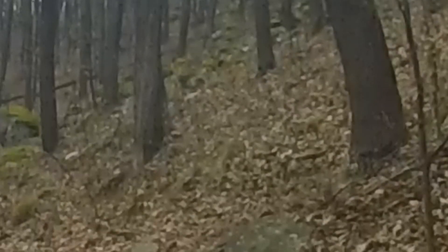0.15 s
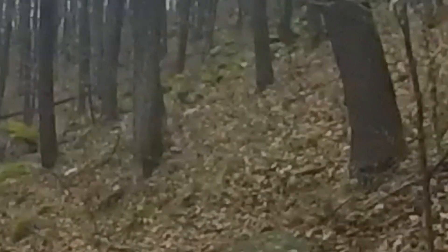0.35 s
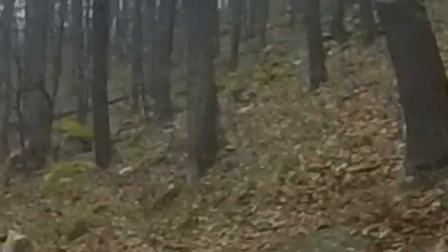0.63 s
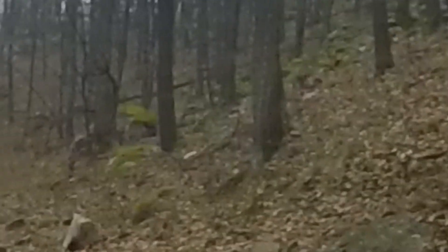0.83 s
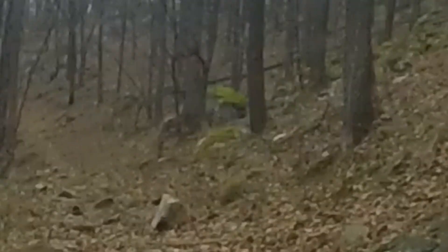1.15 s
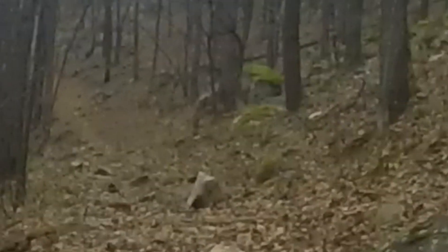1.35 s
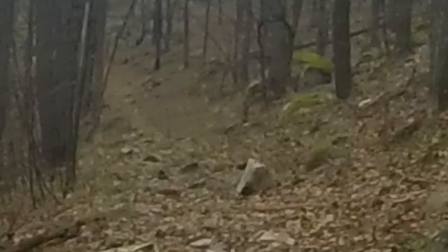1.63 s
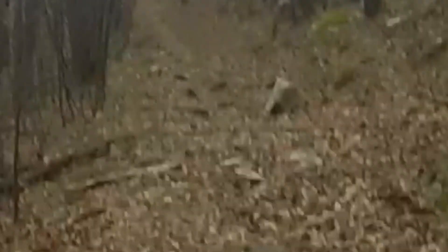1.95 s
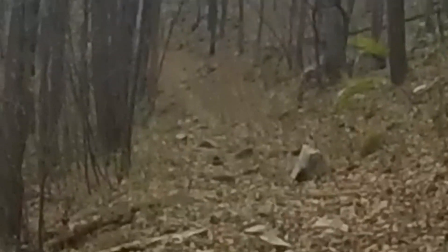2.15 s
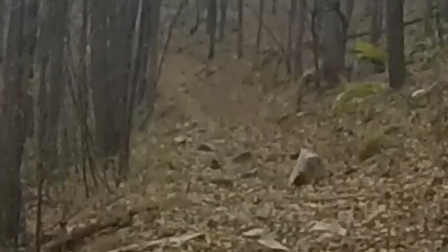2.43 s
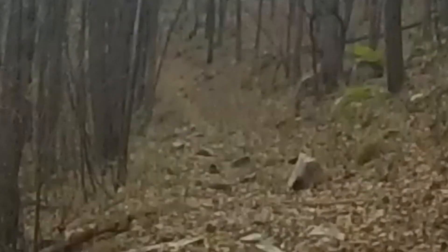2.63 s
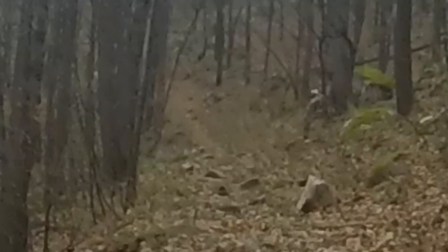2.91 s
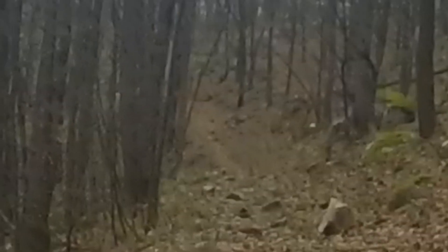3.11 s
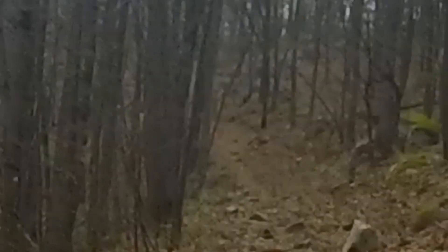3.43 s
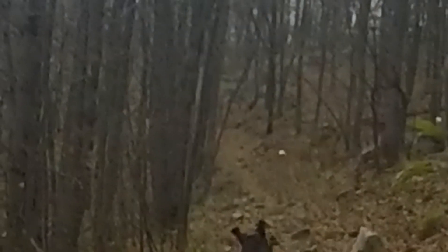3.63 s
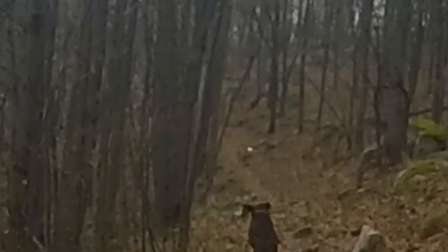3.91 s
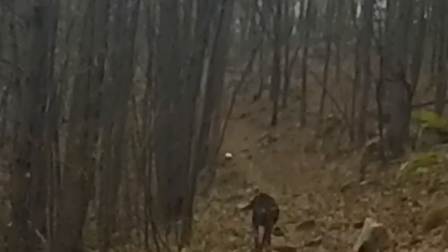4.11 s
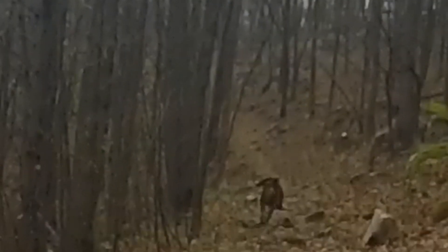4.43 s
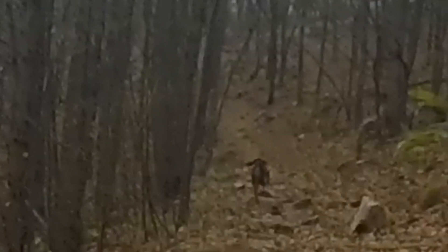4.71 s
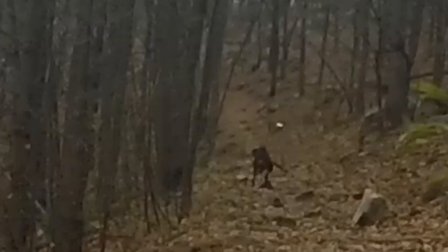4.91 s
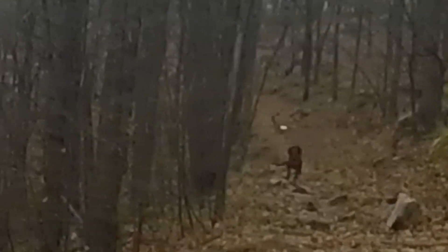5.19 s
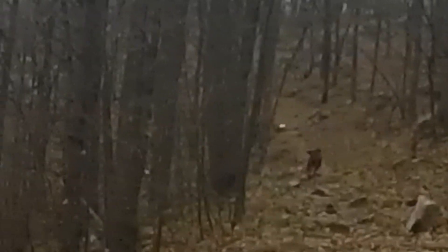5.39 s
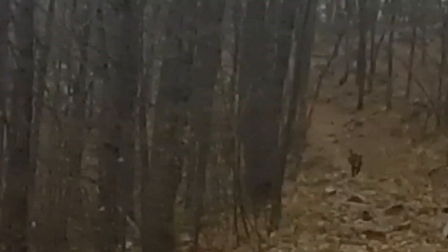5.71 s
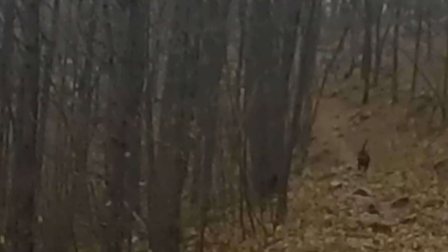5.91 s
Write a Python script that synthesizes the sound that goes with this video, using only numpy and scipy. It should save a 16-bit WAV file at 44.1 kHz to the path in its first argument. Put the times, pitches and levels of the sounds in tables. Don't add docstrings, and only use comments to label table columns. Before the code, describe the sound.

A small cased microphone is carried along a leafy woodland path. Twigs tick and snap close up with brief leaf scrapes and low handling rumble, building to one very loud, sharp crack at about two seconds. Small rustles follow, then a run of hard plastic clasp clicks. It grows quiet, with only faint ticks, steady soft hiss, a thin high insect chirp and a faint distant dog yip at the end.

```python
import sys
import numpy as np
from scipy import signal
from scipy.fft import rfft, irfft, next_fast_len
from scipy.io import wavfile
from scipy.ndimage import uniform_filter1d

SR = 44100
rng = np.random.default_rng(int(sys.argv[2]) if len(sys.argv) > 2 else 0)


def gain_from_db(level_db):
    decades = np.asarray(level_db, float) / 20
    return 10 ** decades


def pcm_store(signal):
    levels = np.round(np.clip(np.atleast_2d(signal), -1, 1) * 32767)
    wavfile.write(sys.argv[1], SR, levels.astype(np.int16).T)


N = 267025

# (f/Hz, level/dB, t60/s)
CASE_MODES = [(487, -11, 0.011), (761, -2.5, 0.02), (1198, -0.5, 0.016), (1656, -7, 0.014),
              (1970, -1.5, 0.0092), (2350, 2.5, 0.012), (2895, -3, 0.0087), (3530, -6, 0.0079),
              (3940, -7.5, 0.0083), (4360, -5.5, 0.0094), (5140, 0, 0.002), (6500, -4, 0.003),
              (7450, -8.5, 0.0063), (8890, -6, 0.0026), (10160, -9, 0.0019), (12800, -7, 0.0013)]


def level(x, db):
    return x * gain_from_db(db) / np.sqrt(np.mean(x ** 2))


def ring(x, modes):
    out = 0
    for k, (hz, db, t60_s) in enumerate(modes):
        pole = np.exp(2j * np.pi * hz / SR - np.log(1000) / (t60_s * SR))
        out = out + (-1) ** k * gain_from_db(db) * signal.lfilter([1], [1, -pole], x).imag
    return out


def tint(x, gain):
    size = next_fast_len(len(x))
    hz = np.maximum(np.fft.rfftfreq(size, 1 / SR), 10)
    return irfft(rfft(x, size) * gain(hz), size)[:len(x)]


def add(track, s, sound):
    i = int(s * SR)
    track[i:i + len(sound)] += sound[:N - i]


def walk(rate_hz):
    hold = int(SR / rate_hz)
    steps = np.repeat(rng.standard_normal(N // hold + 1), hold)
    return 1.3 * uniform_filter1d(uniform_filter1d(steps, hold), hold)[:N]


def strikes(rows, modes, weight_db, rough):
    out = np.zeros(N)
    t_ms = np.arange(2600) / SR * 1000
    splinters = rng.standard_normal((len(rows), len(t_ms)))
    for (s, peak_db, colour, push_ms), splinter in zip(rows, splinters):
        push = rough * splinter * np.exp(-2 * t_ms / push_ms)
        push[:3] += [.3, .6, .3]
        push[26:29] += [.35, .7, .35]
        weighted = [(hz, db + weight_db(hz, colour), t60_s) for hz, db, t60_s in modes]
        sound = ring(push, weighted)
        add(out, s, gain_from_db(peak_db) * sound / np.abs(sound).max())
    return out


def wood():
    # (f/Hz, density/dB per Hz)
    spectrum = [(15, -58), (25, -2), (48, 0), (373, -8.5), (416, -9.5), (516, -11.5), (1790, -16),
                (5000, -23.5), (12900, -35.5), (14800, -40), (16000, -74)]
    hz, db = np.transpose(spectrum)

    def colour(f):
        slope_db = np.interp(np.log(np.minimum(f, 14600)), np.log(hz), db)
        return gain_from_db(slope_db) / (1 + (f / 15150) ** 160)

    hiss = tint(rng.standard_normal(N), colour)
    drift_db = .25 * walk(1.5) + .5 * walk(12)
    return level(hiss * gain_from_db(drift_db), -60)


def sway():
    # (t/s, level/dB)
    rumble = [(0, -74), (.3, -61), (.58, -54), (.95, -59), (1.25, -51), (1.5, -55), (1.8, -50.5),
              (1.94, -40.5), (2.1, -50), (2.22, -62), (2.75, -66.5), (3.47, -65.5), (3.9, -77), (4.84, -63),
              (5.15, -71.5), (6.05, -74)]
    s, db = np.transpose(rumble)
    low = tint(rng.standard_normal(N), lambda hz: 1 / (1 + (hz / 46.0) ** 2.25) / (1 + (16.7 / hz) ** 3))
    lumpy = level(low * gain_from_db(5.0 * walk(25)), 0)
    return lumpy * gain_from_db(np.interp(np.arange(N) / SR, s, db))


def insect():
    # (start/s, length/s, f/Hz, level/dB)
    tones = [
        (5.65, .1, 8800, -83),
        (5.65, .11, 13200, -87),
        (5.67, .07, 10300, -89),
        (0, 6.05, 11400, -96),
    ]
    out = np.zeros(N)
    for s, length_s, hz, db in tones:
        count = int(length_s * SR)
        phase = 2 * np.pi * np.cumsum(hz * (1 + .004 * walk(150)[:count])) / SR
        fade = signal.windows.tukey(count, .4)
        add(out, s, gain_from_db(db) * fade * np.sqrt(2) * np.sin(phase))
    return out


def twigs():
    # (t/s, peak/dB, centre f/Hz)
    snaps = [(0.141, -51, 1500), (0.3736, -35, 1480), (.3848, -33, 3940), (0.508, -45, 1380),
             (.5651, -49, 3040), (0.6359, -37, 1200), (0.9937, -48, 2300), (1.0523, -37.5, 720),
             (1.3945, -33.5, 2920), (1.6912, -28.5, 2700), (1.8183, -31.5, 2350), (1.899, -50, 1660),
             (1.924, -38, 1880), (1.9591, -37, 2400), (2.1562, -45, 1380), (2.1852, -48, 2350),
             (2.251, -46, 4740), (2.353, -42, 1230), (2.7145, -48, 2380), (2.8715, -48, 6500),
             (3.3125, -44.5, 2970), (3.3397, -47, 2200), (3.3997, -45, 1390), (3.4228, -45, 7000),
             (3.4678, -39.5, 1160), (4.3215, -56, 5000), (4.3558, -49, 5100), (5.0405, -55, 9700),
             (5.059, -61, 800)]
    # (t/s, peak/dB, centre f/Hz, dull splinter level/dB, bright splinter level/dB)
    breaks = [
        (0.3835, -25.5, 2360, 0, -10.5),
        (.4912, -39.5, 1480, -25, -5.5),
        (1.9406, -8.5, 1850, -11, -30),
        (1.9418, -13, 3940, -7.5, -9.5),
        (4.3557, -41, 2700, -28, -5),
        (4.8600, -50, 2150, 8.5, -1),
    ]
    snap_push_ms, break_push_ms = 2.8, .75
    splinter_ratio, dull_late_ms, bright_late_ms = 3.73, .86, .6

    def push_ms(ms, hz):
        return ms * (2000 / hz) ** .67

    def weight_db(hz, centre_hz):
        octaves = np.log2(hz / centre_hz)
        return -17 * octaves ** 2 / (1 + .4 * (hz > centre_hz))

    rows = [(s, db, hz, push_ms(snap_push_ms, hz)) for s, db, hz in snaps]
    for s, db, hz, dull_db, bright_db in breaks:
        parts = [(0, 0, hz),
                 (dull_late_ms, dull_db, hz / splinter_ratio),
                 (bright_late_ms, bright_db, hz * splinter_ratio)]
        for late_ms, part_db, part_hz in parts:
            rows.append((s + late_ms / 1000, db + part_db, part_hz, push_ms(break_push_ms, part_hz)))
    return strikes(rows, CASE_MODES, weight_db, rough=.22)


def litter_tail(dry_clicks):
    t = np.arange(6000) / SR
    scatter = rng.standard_normal(len(t)) * np.exp(-t * np.log(1000) / 0.021)
    return gain_from_db(-33.0) * signal.fftconvolve(dry_clicks, scatter)[:N]


def leaves():
    # (start/s, length/s, level/dB, brightness/dB per octave)
    scrapes = [(0.352, 0.044, -53, -0.6), (0.384, 0.026, -52.5, -1.7), (0.629, 0.051, -50, 0.2),
               (0.777, 0.2, -55.5, -1), (0.861, 0.11, -60, 3.5), (1.816, 0.39, -48, -0.3),
               (1.942, 0.033, -55.5, -2.5), (1.995, 0.3, -53.5, 0), (2.34, 0.079, -52, 4),
               (2.503, 0.062, -56.5, 3), (2.575, 0.2, -56, 5), (2.739, 0.17, -63, 4),
               (2.868, 0.026, -66, 6), (3.083, 0.068, -60, 2), (3.188, 0.046, -63, 3),
               (3.308, 0.032, -65, 3.5), (3.425, 0.015, -68.5, -1), (3.606, 0.096, -61, 1),
               (4.314, 0.049, -66.5, 6), (4.862, 0.022, -64.5, -7.5)]
    size, clump = 8000, 160
    out = np.zeros(N)
    for (s, length_s, db, tilt_db), chance in zip(scrapes, rng.random((len(scrapes), 4, size))):
        grain_size = gain_from_db(-2.0 * np.log(chance[2] + 1e-9))
        grains = (chance[0] - .5) * (chance[1] < .35) * grain_size
        clumps = gain_from_db(11 * uniform_filter1d(np.repeat(chance[3, ::clump], clump), size=100))
        along = np.minimum(np.arange(size) / (length_s * SR), 1)
        swell = np.sin(np.pi * along ** .65) ** 2
        modes = [(hz, g + tilt_db * np.log2(hz / 2000), (t60_s + .004) * min(1, (6500 / hz) ** 2))
                 for hz, g, t60_s in CASE_MODES]
        sound = ring(grains * clumps * swell, modes)
        add(out, s, level(sound, db - 12.0) / np.sqrt(length_s * SR / size))
    return tint(out, lambda hz: 1 / (1 + (hz / 14800) ** 30))


def jolts():
    # (t/s, peak/dB, length/ms, inward 1 or outward -1)
    pushes = [(0.3782, -33.5, 7.4, -1), (0.4896, -46, 7.9, -1), (0.574, -38, 8.3, -1),
              (0.5945, -29, 3.55, -1), (0.597, -36, 4.2, 1), (0.602, -34, 9.2, -1), (0.633, -30, 12, -1),
              (1.9396, -12, 7.14, 1), (3.4689, -44, 1.9, -1), (4.859, -45, 5.8, -1), (5.479, -47.5, 6.7, 1)]
    soft_share, vent_hz = .83, 24.
    out = np.zeros(N)
    for s, peak_db, length_ms, sign in pushes:
        push = signal.windows.tukey(int(length_ms * SR) // 1000, soft_share)
        add(out, s, np.sign(sign) * gain_from_db(peak_db) * push)
    return 1.35 * signal.lfilter(*signal.butter(2, vent_hz, "high", fs=SR), out)


def clasp():
    # (t/s, peak/dB, brightness/dB)
    shuts = [
        (3.042, -21.5, 2),
        (3.0855, -39.5, 0),
        (3.1853, -22.5, 0.5),
        (3.3557, -22.5, 2),
        (3.423, -39, -8.5),
        (3.6397, -22.5, 1),
    ]
    # (t/s, peak/dB, brightness/dB)
    opens = [
        (3.2538, -31.5, .4),
        (3.515, -28.5, 0.34),
        (3.7061, -33, -0.31),
    ]
    # (f/Hz, level/dB, t60/s)
    shut_modes = [(1083, -9, 0.037), (1240, -16, 0.05), (1747, -2, 0.019), (2380, 0.5, 0.014),
                  (2680, 3, 0.012), (3520, -0.5, 0.0087), (3970, -3, 0.011), (4405, 1, 0.012),
                  (5690, -9, 0.0072), (6500, -17.5, 0.0047), (8900, -25.5, 0.0053)]
    # (f/Hz, level/dB, t60/s)
    open_modes = [(1130, -4.5, 0.029), (1720, -4.5, 0.025), (2420, 8.5, 0.021), (2940, 6, 0.0051),
                  (3400, 0, 0.01), (4040, 1.5, 0.018), (4630, -4, 0.011), (5500, -14, .007),
                  (8070, -12.5, 0.006)]
    shut_push_ms, open_push_ms = 1.9, .84

    def lift_db(hz, bright_db):
        return (hz > 2600) * bright_db

    shut_rows = [(*row, shut_push_ms) for row in shuts]
    open_rows = [(*row, open_push_ms) for row in opens]
    shutting = strikes(shut_rows, shut_modes, lift_db, rough=.14)
    return shutting + strikes(open_rows, open_modes, lift_db, rough=.14)


def dog():
    start_s, attack_s, hold_s, release_s = 5.932, .014, .086, .024
    from_hz, top_hz, glide_s = 950, 1198, .08
    yip_db, swell_db, quiet_db = -53.5, 2.5, -26
    second_db, second_joins_s = -5, .037
    t = np.arange(N) / SR - start_s
    hz = from_hz + (top_hz - from_hz) * np.sin(np.pi / 2 * np.clip(t / glide_s, 0, 1))
    corners_s = np.cumsum([0, attack_s, hold_s, release_s])
    shape_db = np.interp(t, corners_s, [quiet_db, 0, swell_db, quiet_db], left=-80)
    fading_octave_db = -56 - 300 * np.maximum(t, 0)
    second_share = gain_from_db(second_db) * np.clip(t / second_joins_s, 0, 1)
    out = 0
    for ratio, share, octave_db in (.99, 1, fading_octave_db), (.93, second_share, -66.5):
        phase = 2 * np.pi * np.cumsum(ratio * hz * (1 + .012 * walk(120))) / SR
        voice = gain_from_db(yip_db) * np.sin(phase) + gain_from_db(octave_db) * np.sin(2 * phase)
        out = out + share * gain_from_db(shape_db) * voice
    return np.sqrt(2) * out


def scene():
    clicks = twigs() + clasp()
    hit = clicks + litter_tail(clicks) + leaves() + jolts()
    return (hit + wood() + sway() + insect() + dog())[None]


def band_limit(x):
    return signal.sosfilt(signal.butter(12, 16500, fs=SR, output="sos"), x)


def record(dry):
    low_pass = signal.ellip(8, .2, 60, 16400, fs=SR, output="sos")
    return band_limit(signal.sosfilt(low_pass, dry))


dry = scene()
out = record(dry)
pcm_store(out)
```